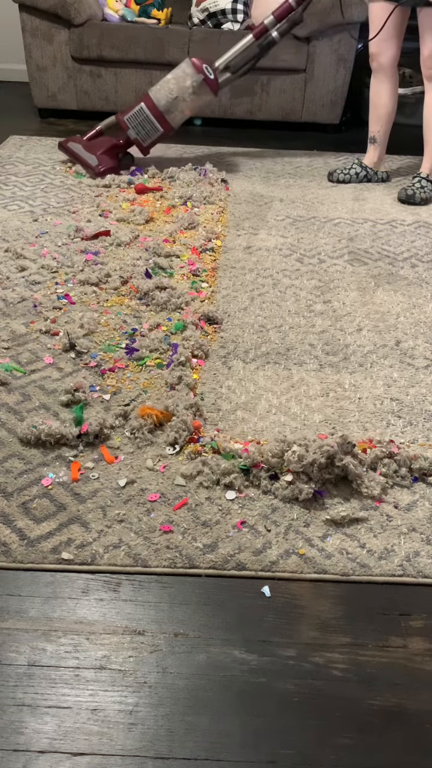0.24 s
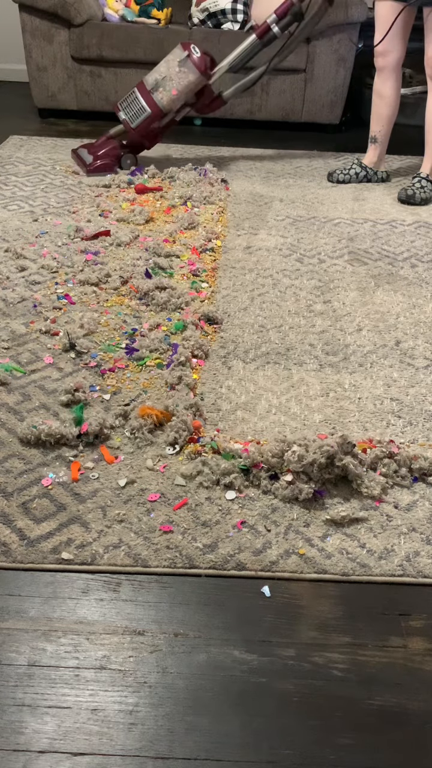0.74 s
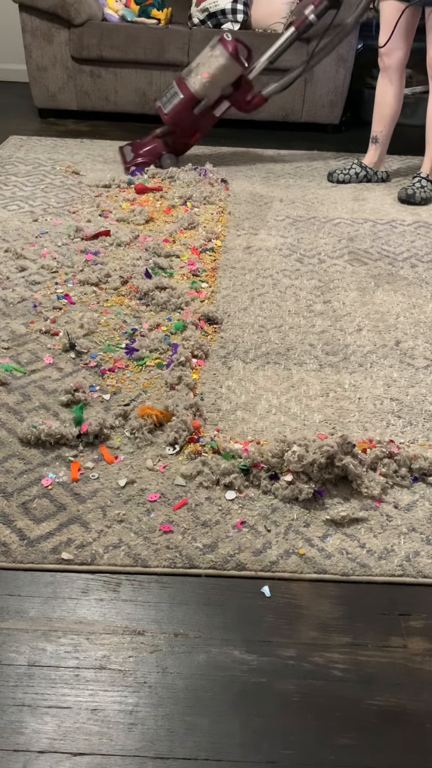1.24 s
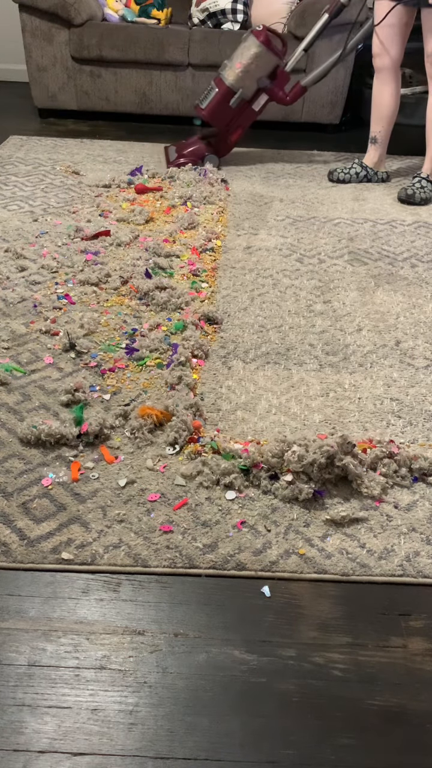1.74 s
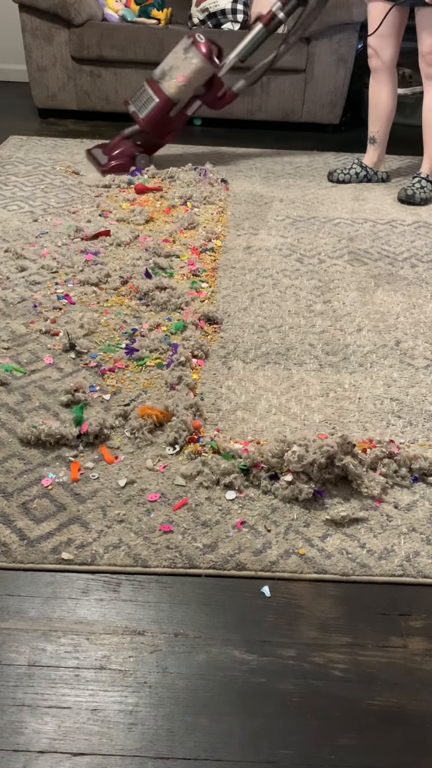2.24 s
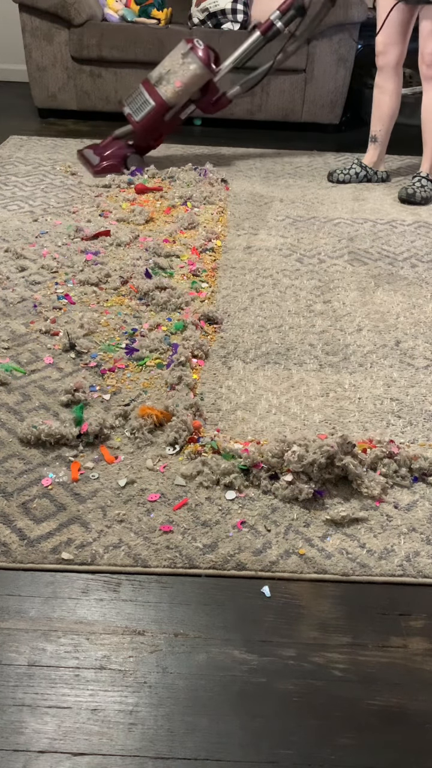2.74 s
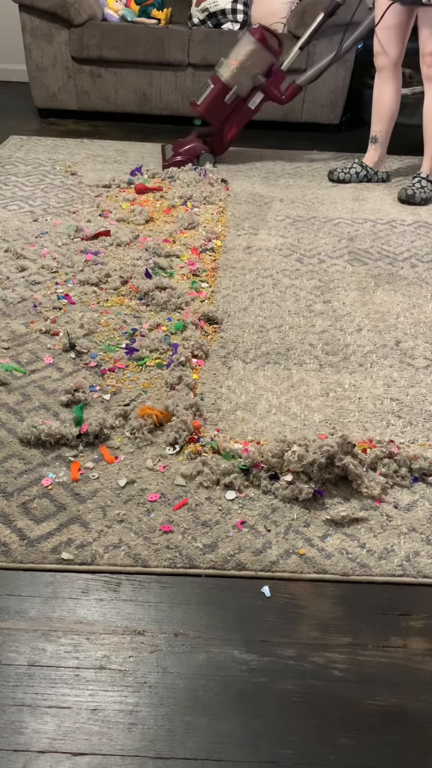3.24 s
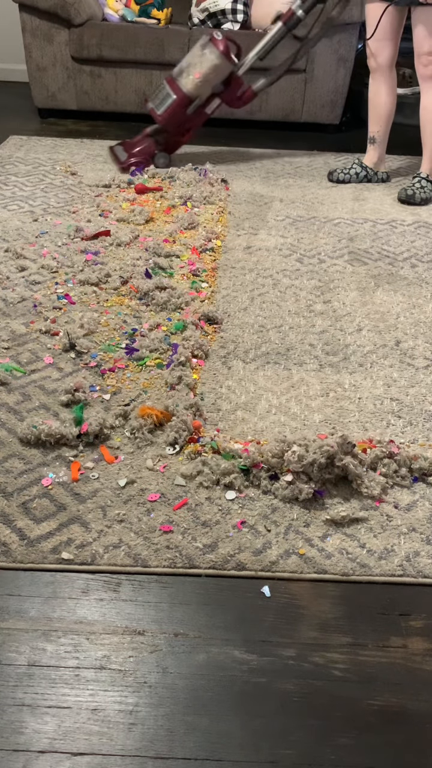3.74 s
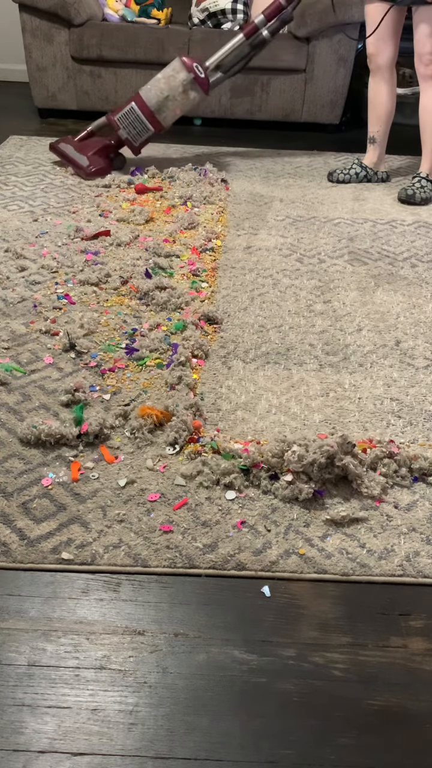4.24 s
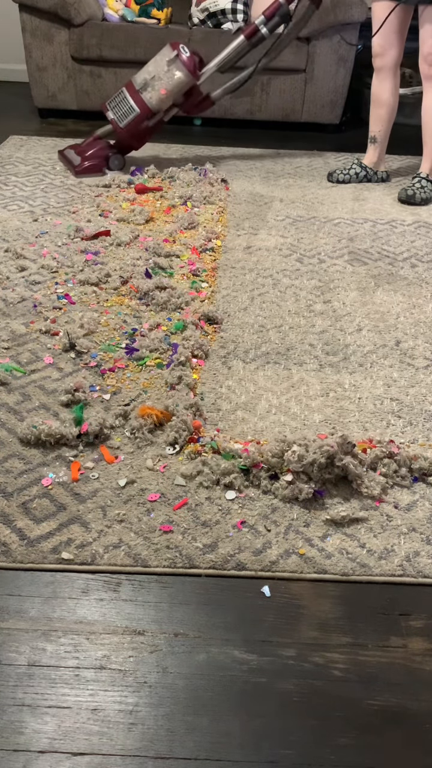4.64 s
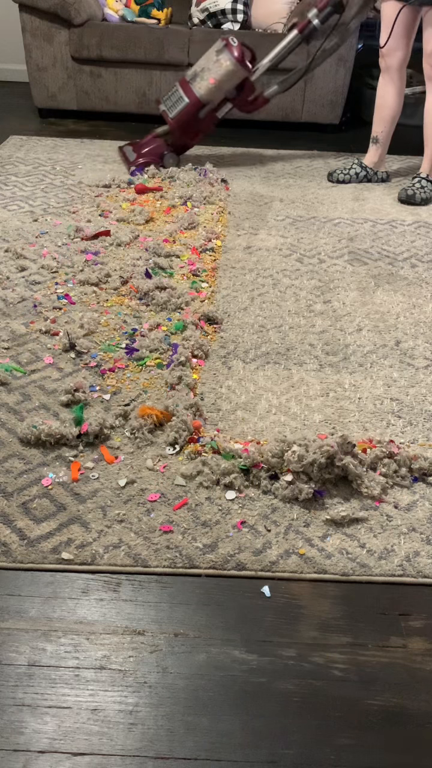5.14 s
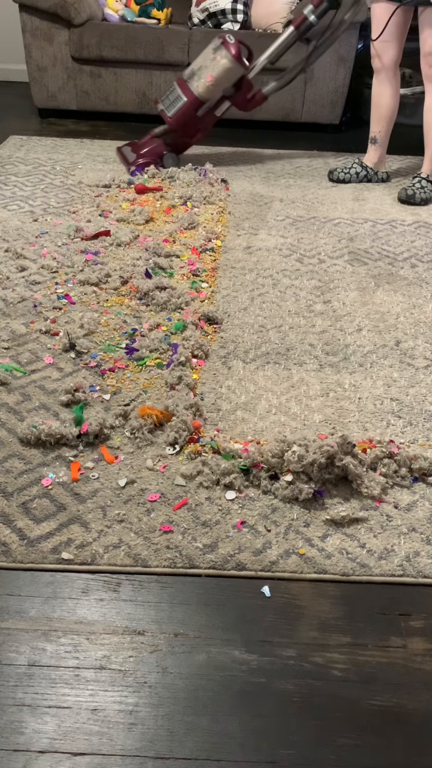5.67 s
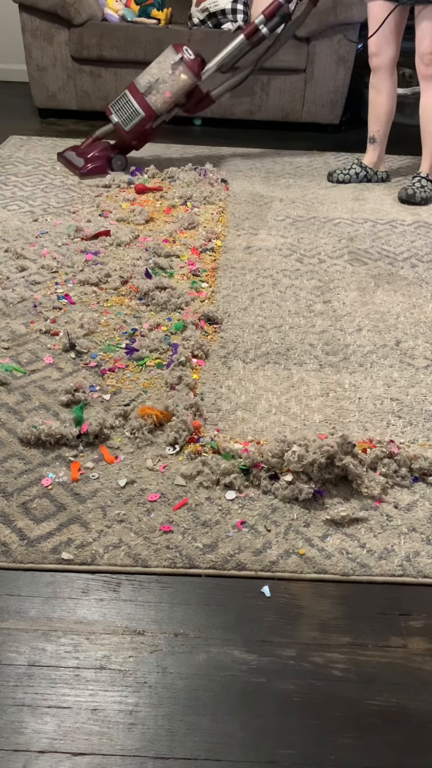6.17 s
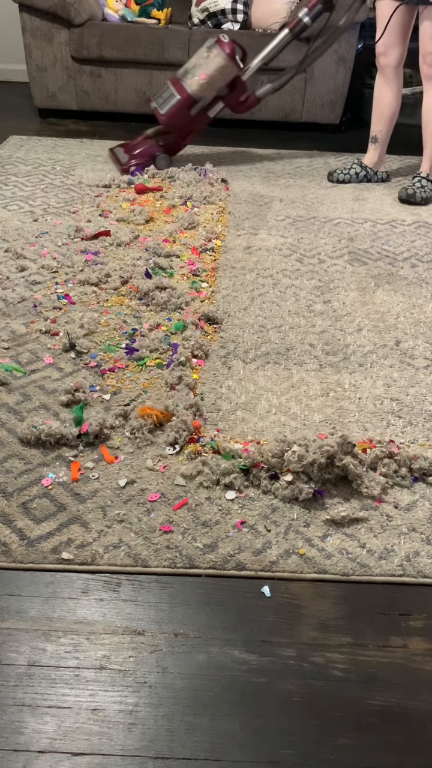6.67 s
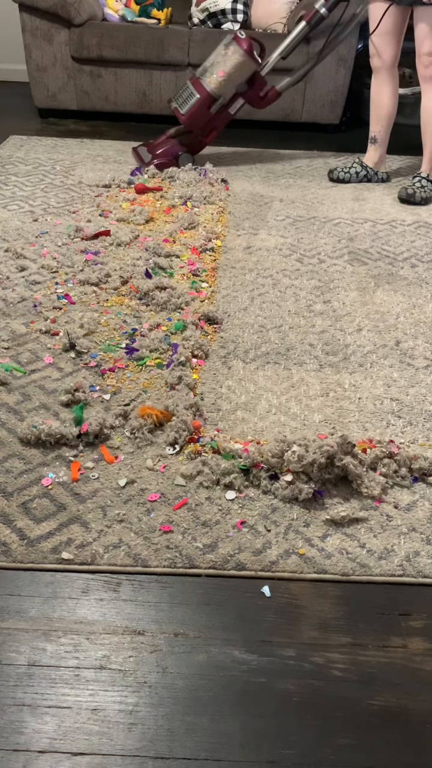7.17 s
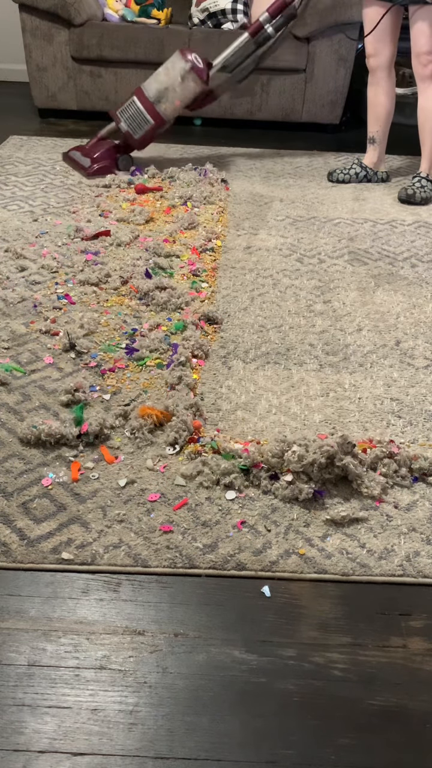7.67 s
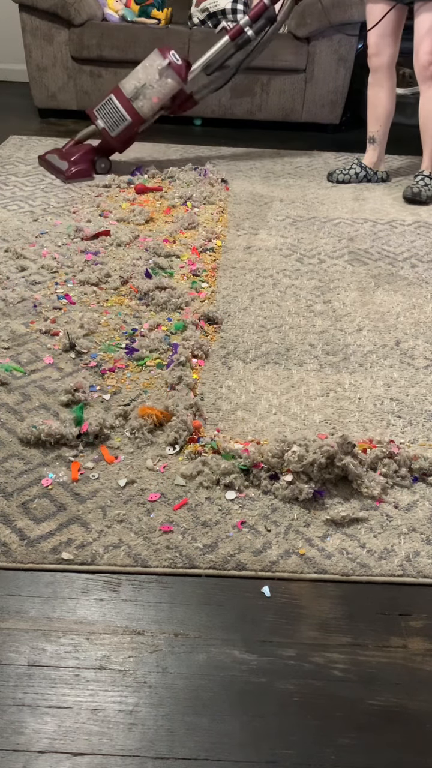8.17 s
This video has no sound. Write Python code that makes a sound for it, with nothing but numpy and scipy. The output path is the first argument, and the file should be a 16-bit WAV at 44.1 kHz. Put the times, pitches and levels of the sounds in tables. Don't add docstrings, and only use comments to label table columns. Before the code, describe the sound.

Indoor vacuuming to and fro: steady airy suction, sagging brush hum, and bright showers of gritty debris ticking and rattling against hard plastic.

```python
import sys
import numpy as np
from scipy import signal
from scipy.fft import rfft, irfft, next_fast_len
from scipy.io import wavfile
from scipy.ndimage import uniform_filter1d

SR = 44100
rng = np.random.default_rng(int(sys.argv[2]) if len(sys.argv) > 2 else 0)


def undo_db(level):
    steps = np.asarray(level, float) / 20
    return 10 ** steps


def master(y):
    cut = np.clip(np.atleast_2d(y).T, -1, 1)
    pcm = np.round(cut * 32767)
    wavfile.write(sys.argv[1], SR, pcm.astype(np.int16))


N = 370881

# start [s], brush speed [turns/s], hum level [dB], whine level [dB], air rush in the bin [dB].
STROKES = [(0.0, 65, -57, -55.5, -40), (0.698, 62, -69, -58, -50), (1.1, 63, -58.5, -84, -45.5),
           (1.781, 56, -72, -55, -47.5), (2.721, 61.5, -57.5, -73, -43), (3.43, 52.3, -63.5, -55, -43.5),
           (3.95, 61, -61.5, -61, -42.5), (4.801, 57, -64.5, -62, -54), (5.519, 54.8, -69.5, -56.5, -51.5),
           (6.451, 60.5, -61.5, -81.5, -49), (7.101, 52.55, -68, -56.5, -46), (7.851, 71, -61, -59, -43)]
# frequency [Hz], density [dB per Hz].
AIR_SPECTRUM = [(25, -29), (60, -14), (120, -15), (190, -11), (260, -5), (500, -0.5), (1000, -8),
                (2200, -12), (3300, -7.5), (5000, -13), (7500, -17.5), (11000, -28.5), (13500, -16),
                (15000, -26.5)]
# multiple of the turning rate, level at 54 turns/s [dB], loss [dB per extra turn/s].
BRUSH_ORDERS = [(1, -69.5, 0), (2, -68, 1.5), (3, -72.5, -0.2), (5, -82, 8), (6, -64, 1.5)]
# time [s], rattle level [dB].
STREAM = [(0.39, -46), (0.465, -18), (0.7, -22), (1.2, -28.5), (2.0, -31.5), (2.25, -36), (3.05, -37.5),
          (3.3, -45.5), (3.97, -34.5), (4.2, -52), (4.33, -57), (4.365, -38.5), (4.41, -22), (4.78, -21),
          (4.98, -25.5), (5.6, -28), (6.4, -31.5), (6.7, -39), (7.7, -39.5), (8.0, -51)]
# time [s], rattle level [dB].
LAST_BITE = [
    (8.11, -53),
    (8.14, -20.5),
    (8.2, -33),
    (8.26, -19),
    (8.41, -22.5),
]
# time [s], level [dB].
CLUMPS = [(0.19, -50), (0.56, -36), (1.02, -22.5), (1.38, -25), (1.58, -29), (1.82, -39.5), (1.922, -25),
          (2.13, -49), (2.3, -32.5), (2.429, -29.5), (2.61, -31), (2.72, -28), (2.812, -25.5), (3.01, -26),
          (3.17, -27.5), (3.391, -28), (3.69, -61), (4.038, -24.5), (4.394, -13.5), (5.718, -41),
          (6.0, -28), (6.45, -28), (6.781, -28.5), (7.031, -28.5), (7.2, -29), (7.279, -29), (7.448, -23),
          (7.54, -23.5), (7.846, -24.5), (8.049, -29)]
# frequency [Hz], density [dB per Hz].
GRIT_SPECTRUM = [(150, -27), (300, -11), (750, -10), (1300, -8.5), (2300, -10.5), (3500, -5), (6500, 0),
                 (7600, -3), (9000, 2.5), (10200, 0.5), (12000, 2), (12800, 3.2), (14000, -8), (15000, -3)]
# time
# [s], peak level [dB], share below 8 kHz [dB].
FIRST_TICKS = [(0.2011, -22, -17), (0.3955, -23, -10), (0.4212, -9, -13), (0.4365, -11, -8),
               (0.4497, -3, -11), (0.4683, -3, -10), (0.4886, -3, -16), (0.5377, -6, -11), (0.5657, -8, -3),
               (0.5864, -3, -13), (0.6106, -4, -14), (0.7248, -5, -17), (0.772, -6, -13), (0.8071, -9, -20),
               (0.8336, -8, -9), (0.8688, -6, -15), (0.8989, -9, -18), (0.9091, -12, -10),
               (0.9528, -10, -13), (0.9683, -8, -17), (0.9991, -9, -13), (1.0207, -7, -15),
               (1.0316, -8, -16), (1.0464, -8, -15), (1.1122, -5, -20), (1.1293, -7, -17),
               (1.1655, -7, -20), (1.2513, -11, -12), (1.2646, -12, -16), (1.2918, -12, -12),
               (1.3009, -11, -12), (1.3824, -6, -17), (1.4703, -9, -18), (1.5128, -17, -12),
               (1.6486, -15, -10), (1.6725, -5, -19), (1.6914, -12, -21), (1.7068, -15, -15),
               (1.7474, -9, -14), (1.7866, -14, -15), (1.8223, -6, -17), (1.8388, -11, -16),
               (1.8728, -16, -14), (1.8831, -17, -11), (1.8944, -13, -9), (1.9231, -6, -16),
               (2.029, -14, -15), (2.038, -16, -14), (2.0724, -16, -12), (2.0837, -16, -12),
               (2.0985, -21, -1), (2.1332, -13, -12), (2.1787, -19, -15), (2.1953, -16, -14),
               (2.2235, -15, -10), (2.2388, -7, -17), (2.2688, -17, -15), (2.2871, -10, -13)]
SECOND_TICKS = [(2.3062, -8, -14), (2.3518, -13, -15), (2.3586, -6, -10), (2.3699, -12, -19),
                (2.4189, -20, -7), (2.4335, -6, -11), (2.4432, -17, -7), (2.4575, -13, -15),
                (2.4641, -16, -11), (2.4888, -21, -12), (2.5239, -16, -13), (2.5644, -10, -20),
                (2.6034, -21, -9), (2.6151, -14, -14), (2.6244, -20, -13), (2.6344, -18, -7),
                (2.6685, -21, -10), (2.6867, -16, -12), (2.6955, -17, -14), (2.7218, -14, -12),
                (2.7305, -10, -10), (2.7409, -14, -17), (2.7522, -15, -15), (2.7663, -16, -13),
                (2.7916, -16, -9), (2.8161, -6, -13), (2.8452, -11, -9), (2.8755, -19, -10),
                (2.8956, -20, -13), (2.9049, -8, -18), (2.9134, -15, -13), (2.9559, -11, -12),
                (2.9734, -9, -12), (3.01, -10, -12), (3.0188, -9, -14), (3.0383, -10, -11),
                (3.1105, -17, -13), (3.1198, -23, -12), (3.1478, -15, -18), (3.1644, -13, -9),
                (3.1798, -13, -8), (3.2194, -18, -20), (3.2303, -10, -23), (3.3465, -28, -11),
                (3.3938, -11, -16), (3.4024, -13, -13), (3.4506, -12, -9), (3.4873, -14, -12),
                (3.497, -5, -22), (3.5663, -21, -13), (3.6181, -20, -11), (3.697, -4, -19),
                (3.7432, -17, -14), (3.784, -23, -6), (3.8112, -19, -8), (3.8397, -23, -8),
                (3.8934, -20, -12), (3.9093, -18, -9)]
THIRD_TICKS = [(3.9451, -12, -20), (3.9528, -18, -11), (3.9896, -14, -8), (4.0271, -15, -13),
               (4.0449, -6, -6), (4.1551, -18, -14), (4.3465, -28, -12), (4.3987, -7, -10),
               (4.4986, -7, -11), (4.5056, -5, -12), (4.7175, -6, -15), (4.8097, -5, -15),
               (4.8615, -6, -13), (4.885, -8, -15), (4.8968, -6, -16), (4.9223, -6, -13),
               (4.9317, -10, -10), (4.968, -11, -15), (5.0171, -10, -12), (5.031, -5, -15),
               (5.062, -11, -12), (5.1457, -7, -13), (5.2537, -12, -12), (5.3621, -11, -13),
               (5.4005, -13, -16), (5.4251, -11, -14), (5.449, -10, -12), (5.5703, -13, -15),
               (5.5836, -10, -10), (5.592, -13, -14), (5.6274, -12, -20), (5.6953, -7, -24),
               (5.7228, -9, -11), (5.7602, -15, -7), (5.7952, -10, -11), (5.8172, -10, -14),
               (5.8277, -13, -13), (5.8601, -10, -18), (5.8939, -12, -12), (5.9183, -10, -18),
               (5.9254, -14, -11), (5.972, -11, -14), (5.9984, -13, -8), (6.0085, -9, -13),
               (6.0294, -11, -15), (6.0812, -8, -6), (6.0992, -13, -10), (6.1133, -13, -14),
               (6.1324, -8, -15), (6.1651, -12, -17), (6.207, -14, -14), (6.2209, -16, -12),
               (6.2457, -15, -18), (6.2589, -11, -17), (6.3177, -16, -14), (6.333, -14, -14),
               (6.3442, -10, -13), (6.3723, -15, -14)]
FOURTH_TICKS = [(6.4285, -18, -11), (6.4505, -12, -15), (6.4571, -10, -11), (6.4739, -12, -17),
                (6.4852, -13, -20), (6.4926, -12, -16), (6.5249, -16, -14), (6.5403, -6, -21),
                (6.6044, -17, -21), (6.6116, -17, -20), (6.6337, -19, -14), (6.661, -13, -19),
                (6.6842, -20, -9), (6.7111, -22, -8), (6.7353, -20, -13), (6.7592, -15, -16),
                (6.7828, -9, -18), (6.8774, -14, -19), (6.9305, -20, -12), (6.988, -20, -12),
                (7.0165, -17, -15), (7.037, -16, -12), (7.0644, -17, -10), (7.0798, -18, -19),
                (7.1201, -22, -16), (7.1341, -23, -13), (7.1526, -22, -11), (7.1748, -21, -13),
                (7.2036, -17, -11), (7.2118, -11, -10), (7.2839, -18, -12), (7.3766, -11, -18),
                (7.4529, -17, -3), (7.4712, -13, -7), (7.5114, -8, -17), (7.5455, -13, -10),
                (7.6492, -17, -18), (7.7214, -20, -14), (7.7667, -16, -17), (7.8255, -26, -10),
                (7.8471, -11, -18), (7.879, -9, -9), (7.9647, -22, -12), (8.0518, -6, -16),
                (8.1263, -16, -7), (8.1339, -3, -18), (8.1803, -10, -16), (8.2074, -9, -12),
                (8.2367, -4, -20), (8.2461, -4, -20), (8.2524, -4, -12), (8.2645, -8, -7),
                (8.2723, -5, -12), (8.31, -4, -12), (8.3494, -6, -11)]
# time [s], peak level [dB], ring frequency [Hz], 60 dB decay time [s].
PINGS = [
    (.255, -33, 11000, 0.11),
    (3.378, -39, 10670, 0.0693),
    (3.525, -34, 11000, .12),
    (3.558, -32.5, 10780, 0.086),
]
# time [s], peak level [dB], ring frequency [Hz].
KNOCKS = [
    (1.836, -33, 445),
    (1.928, -31, 461),
    (2.565, -37, 667),
    (3.392, -39, 600),
    (3.489, -32, 541),
    (5.449, -36, 444.7),
    (7.204, -37, 600),
]
# start [s], length [s], ring [Hz], width [Hz], level [dB].
BOOMS = [
    (.5, 0.34, 750, 90, -45),
    (4.413, 0.37, 754, 110, -42.5),
    (8.252, 0.16, 754, 110, -49),
]
# frequency [Hz], phase [half turns].
LEFT_LEAD = [(0, 0), (780, -.2), (1600, 0), (4600, 1), (6950, 2), (9000, 3), (15300, 6), (22050, 9.2)]
# frequency [Hz], coherence [0 to 1].
LIKENESS = [(100, 0.97), (400, 0.91), (1000, 0.069), (1700, 0.59), (2500, 0.15), (3600, 0.44), (4300, 0.77)]
# frequency [Hz], left minus right [dB].
LEFT_MINUS_RIGHT = [(60, 2), (240, -0.5), (950, -1.5), (3770, -0.5), (15000, -1.5)]
# frequency [Hz], width [Hz], height [dB].
BODY_MODES = [(234.3, 32, 7.5), (276, 17.5, 7.5), (324, 9.5, 3.5), (399, 16, -1.5), (750, 53, 3.5),
              (977, 17, 6), (14510, 970, 11.5)]


def evened(x):
    return x / np.sqrt(np.mean(x ** 2) + 1e-20)


def read(points, hz):
    f, value = np.transpose(points)
    return np.interp(np.log(hz + 1), np.log(f + 1), value)


def curve(rows):
    s, value = np.transpose(rows)
    return np.interp(np.arange(N) / SR, s, value)


def colour(x, points):
    log_gain = np.log(undo_db(read(points, abs(np.fft.fftfreq(4096, 1 / SR)))))
    taps = np.fft.ifft(np.exp(np.conj(signal.hilbert(log_gain)))).real[:2048]
    return signal.oaconvolve(x, taps)[:len(x)]


def band(x, hz, side):
    return signal.sosfilt(signal.butter(2, hz, side, fs=SR, output="sos"), x)


def smooth(x, s):
    return uniform_filter1d(x, size=max(round(s * SR), 1), mode="nearest")


def delayed(x, s):
    return np.interp(np.arange(N) - s * SR, np.arange(N), x)


def drift(hz):
    z = rfft(rng.standard_normal(N // 64 + 2))
    coarse = irfft(z / (1 + (np.linspace(0, SR / 128, len(z)) / hz) ** 2))
    return np.interp(np.arange(N) / 64, np.arange(len(coarse)), evened(coarse), right=0)


def add(mix, s, sound):
    part = mix[round(s * SR):][:len(sound)]
    part += sound[:len(part)]


def strokes():
    sag_per_s, hum_rise_db_per_s, turn_s = 2.5, 12, 0.12
    whine_lag_s, whine_turn_s = 0.23, 0.22
    start, *held = np.transpose(STROKES)
    t = np.arange(N) / SR
    row = np.clip(np.searchsorted(start, t) - 1, 0, None)
    speed, hum_db, whine_db, rush_db = (v[row] for v in held)
    since = t - start[row]
    return (smooth(speed - sag_per_s * since, turn_s),
            smooth(hum_db + hum_rise_db_per_s * since, turn_s),
            smooth(delayed(whine_db, whine_lag_s), whine_turn_s),
            smooth(rush_db, turn_s))


def air(level_db=-50.5, flutter_db=1.5):
    return undo_db(level_db + flutter_db * drift(11.0)) * evened(colour(rng.standard_normal(N), AIR_SPECTRUM))


def motors(whine_hz=631.3, waver=0.0073, whine_waver=0.0031, throb_db=1.5):
    speed, fourth_db, whine_db, _ = strokes()
    turns = np.cumsum(speed * (1 + waver * drift(11.4))) / SR
    fourth_db = fourth_db - 0.13 * SR * abs(np.gradient(speed))
    orders = [(k, db - loss * (speed - 54)) for k, db, loss in BRUSH_ORDERS]
    orders.append((4, fourth_db - 4))
    hum = sum(undo_db(db + throb_db * drift(2.1)) * np.sin(2 * np.pi * k * turns) for k, db in orders)
    whine_turns = np.cumsum(whine_hz * (1 + whine_waver * drift(19))) / SR
    whine = undo_db(whine_db + throb_db / 2 * drift(39)) * np.sin(2 * np.pi * whine_turns)
    return np.sqrt(2) * (hum + whine)


def rumble(level_db=-20, top_hz=194):
    low = band(band(rng.standard_normal(N), top_hz, "low"), top_hz, "low")
    return undo_db(strokes()[3] + level_db) * evened(band(low, 85, "high"))


def stream_db():
    rise_s, t60_s = 0.0031, 0.44
    trim_db = -2.5
    power = undo_db(2 * curve(STREAM)) + undo_db(2 * curve(LAST_BITE))
    t = np.arange(SR // 2) / SR
    shape = np.minimum(t / rise_s, 1) * undo_db(-60 * t / t60_s) ** 2
    for s, db in CLUMPS:
        add(power, s, undo_db(2 * (db + trim_db)) * shape)
    return 10 * np.log10(power)


def shower(per_s=1800.0, thicken=0.77, spread_db=1.5, clump_db=2.0, t60=0.0059, kinds=6):
    rate = per_s * undo_db(thicken * (np.maximum(stream_db(), -30) + 26.5))
    size = undo_db(spread_db * np.minimum(rng.exponential(1, N), 4) + clump_db * drift(45))
    strikes = size * (rng.random(N) < rate / SR) / np.sqrt(rate)
    kind = rng.integers(0, kinds, N)
    decay = undo_db(-60 * np.arange(200) / SR / t60)
    total = np.zeros(N)
    for k in range(kinds):
        ring = rng.standard_normal(200) * decay
        total += signal.oaconvolve(strikes * (kind == k), ring)[:N]
    return evened(total)


def rattle(crumbs):
    return undo_db(stream_db()) * evened(band(colour(crumbs, GRIT_SPECTRUM), 1980, "high"))


def drum_db():
    base_db, slope, lag_s, top_db = -27, 1.39, 0.0066, -30
    driven_db = base_db + slope * (smooth(delayed(stream_db(), lag_s), lag_s) + 17.5)
    return 10 * np.log10(undo_db(2 * np.minimum(driven_db, top_db)) + undo_db(2 * strokes()[3]))


def drum(crumbs, boost_db=-4.0, follow=0.5):
    clumps = abs(uniform_filter1d(crumbs ** 2, 300)) ** (follow / 2)
    wall = band(colour(clumps * rng.standard_normal(N), GRIT_SPECTRUM), 2280, "low")
    return undo_db(drum_db() + boost_db) * evened(wall)


def patchy(x, depth_db=5.5):
    z = signal.stft(x, nperseg=2048)[2]
    patches = uniform_filter1d(rng.standard_normal(z.shape), size=2, axis=0)
    patches = uniform_filter1d(patches, size=6, axis=1)
    return signal.istft(z * undo_db(depth_db * evened(patches)), nperseg=2048)[1][:N]


def ticks(boost_db=4.0, crack_t60=0.005):
    out, t = np.zeros(N), np.arange(600) / SR
    rows = FIRST_TICKS + SECOND_TICKS + THIRD_TICKS + FOURTH_TICKS
    noise = rng.standard_normal((len(rows), 600)) * undo_db(-60 * t / crack_t60)
    cracks = colour(noise.ravel(), GRIT_SPECTRUM).reshape(noise.shape)
    bright = band(cracks, 8000, "high")
    dull = band(band(band(cracks, 7100, "low"), 3000, "high"), 3000, "high")
    for (s, db, share_db), high, low in zip(rows, bright, dull):
        crack = high / abs(high).max() + undo_db(share_db) * low / abs(low).max()
        add(out, s, undo_db(db) * crack)
    return undo_db(boost_db) * out


def echoes(strikes, t60=0.19):
    keep = 10 ** (-6 / (t60 * SR))
    power = signal.lfilter([1 - keep], [1, -keep], strikes ** 2)
    return np.sqrt(power) * evened(band(colour(rng.standard_normal(N), GRIT_SPECTRUM), 1530, "high"))


def knocks(t60=0.099, rise=0.007, spread=0.126, boost_db=-5.5):
    out, t = np.zeros(N), np.arange(SR // 4) / SR
    detunings = 1 + spread * rng.standard_normal((len(KNOCKS), 5))
    for (s, db, hz), detune in zip(KNOCKS, detunings):
        modes = np.sin(2 * np.pi * hz * detune[:, None] * t).sum(0)
        add(out, s, undo_db(db + boost_db - 60 * t / t60) * (1 - np.exp(-t / rise)) * modes)
    for s, db, hz, ring_t60 in PINGS:
        add(out, s, undo_db(db - 60 * t / ring_t60) * np.sin(2 * np.pi * hz * t))
    return out


def booms():
    out = np.zeros(N)
    for s, length, hz, width, db in BOOMS:
        t = np.arange(0, length, 1 / SR)
        ring = signal.lfilter(*signal.iirpeak(hz, hz / width, SR), rng.standard_normal(SR))[:len(t)]
        add(out, s, undo_db(db) * np.sin(np.pi * np.sqrt(t / length)) * evened(ring))
    return out


def ports(x, other):
    size = next_fast_len(N + 512)
    hz = np.fft.rfftfreq(size, 1 / SR)
    same = np.clip(read(LIKENESS, hz), 0, 1)
    tilt = undo_db(read(LEFT_MINUS_RIGHT, hz) / 2)
    lag = np.exp(-1j * np.pi * np.interp(hz, *np.transpose(LEFT_LEAD)))
    body = undo_db(sum(db / (1 + (2 * (hz - f) / width) ** 2) for f, width, db in BODY_MODES))
    left = rfft(x, size)
    right = left * same * lag + np.sqrt(1 - same ** 2) * rfft(other, size)
    return irfft(body * np.array([left * tilt, right / tilt]), size)[:, :N]


def scene():
    crumbs = shower()
    tones = motors() + knocks() + rumble() + booms()
    soft, hard = rattle(crumbs), ticks()
    strikes = soft + undo_db(-7) * hard
    near = soft + hard + undo_db(-4.0) * echoes(strikes) + patchy(drum(crumbs) + air()) + tones
    other_paths = echoes(strikes) + patchy(drum(crumbs) + air()) + tones
    return ports(near, other_paths)


def attacks(x, jump_db=10.5, memory=0.7):
    blocks = (band(x, 5000, "high")[:N // 128 * 128] ** 2).reshape(-1, 128).mean(1)
    jump = blocks > undo_db(2 * jump_db) * signal.lfilter([0, 1 - memory], [1, -memory], blocks)
    held = np.minimum(np.convolve(jump, np.ones(4))[1:len(jump) + 1], 1)
    return smooth(np.interp(np.arange(N) / 128 - 0.5, np.arange(len(held)), held), 0.003)


def below(x, hz):
    return signal.oaconvolve(x, signal.firwin(511, hz, window=("kaiser", 9), fs=SR)[None], "same")


def joint_stereo(x, under_db=-4.0, from_hz=3900):
    hz, _, z = signal.stft(np.array([x[0] + x[1], x[0] - x[1]]) / 2, SR, nperseg=2048)
    power = (abs(z[:, :1024]) ** 2).reshape(2, 64, 16, -1).mean(2)
    weak = power < undo_db(2 * under_db) * power[::-1]
    z[:, :1024] *= ~(np.repeat(weak, 16, axis=1) & (hz[:1024] > from_hz)[:, None])
    mid, side = signal.istft(z, SR, nperseg=2048)[1][:, :N]
    return np.array([mid + side, mid - side])


def top_cut(x):
    return signal.sosfilt(signal.butter(12, 16810, fs=SR, output="sos"), x)


def record(dry):
    soft = 1.4 * np.tanh(dry / 1.4)
    sudden = attacks(soft[0])
    steady = joint_stereo(below(soft * (1 - sudden), 15750))
    return top_cut(steady + below(soft * sudden, 16700))


dry = scene()
out = record(dry)
master(out)
```